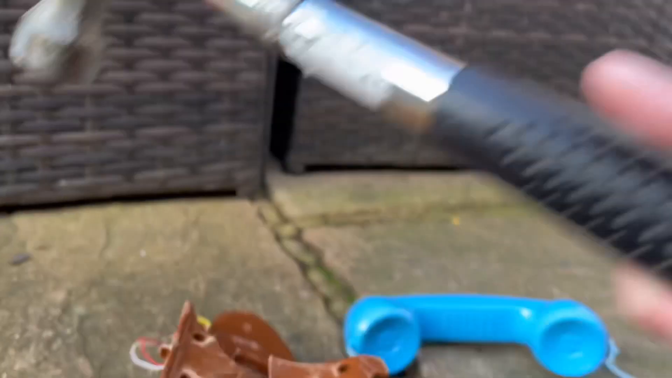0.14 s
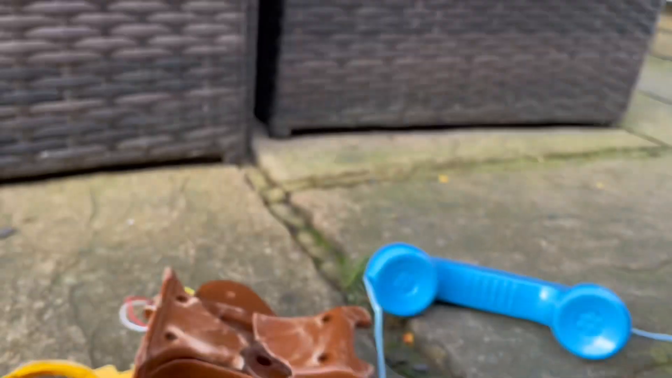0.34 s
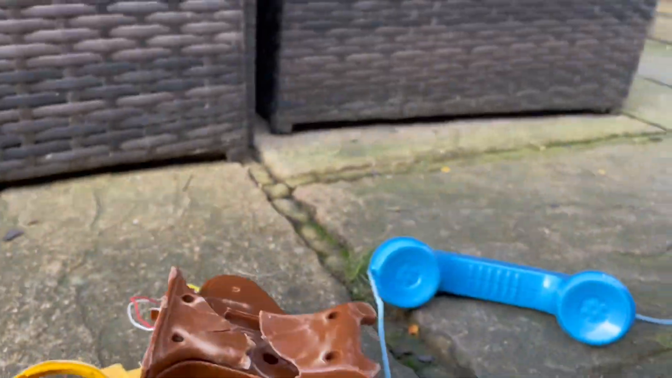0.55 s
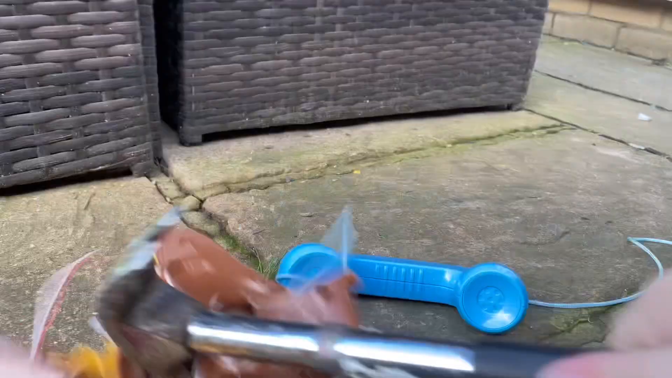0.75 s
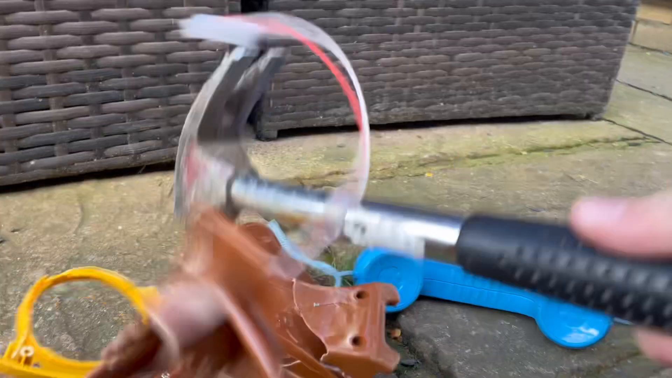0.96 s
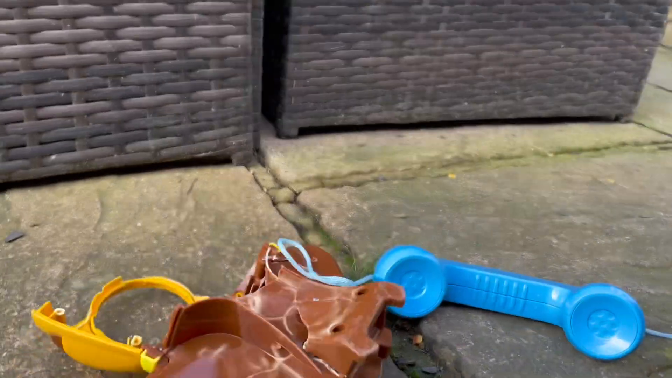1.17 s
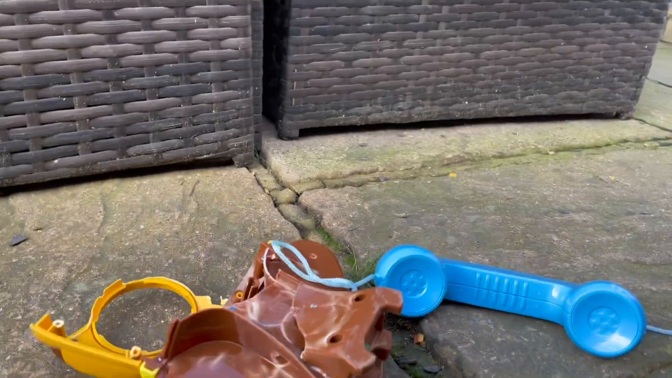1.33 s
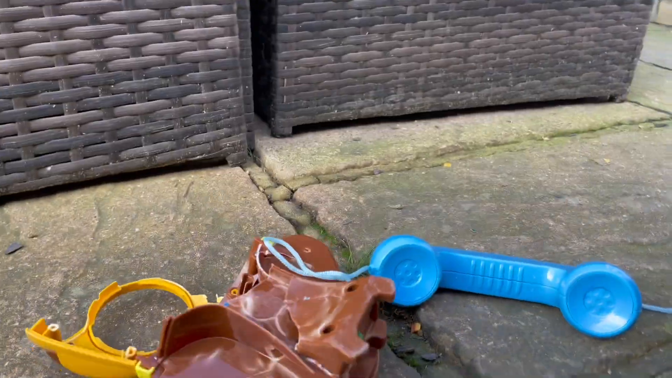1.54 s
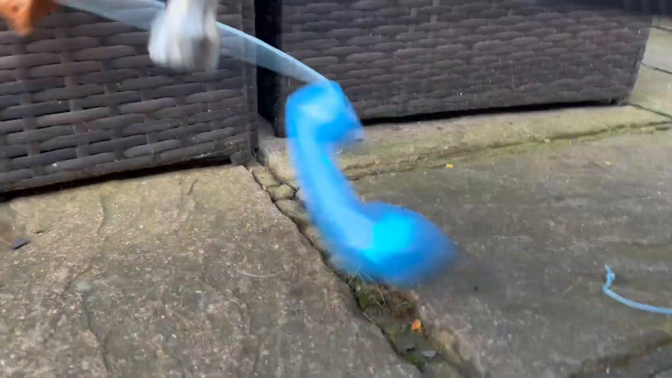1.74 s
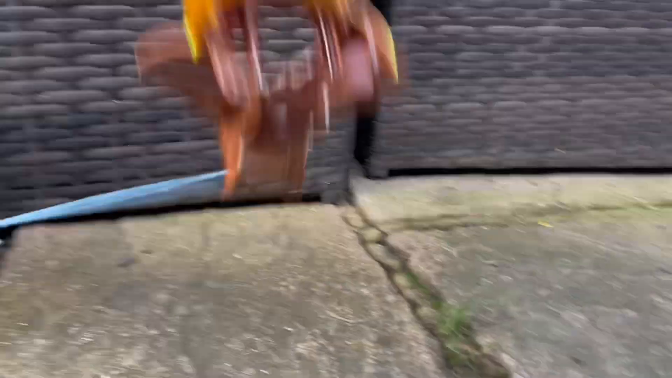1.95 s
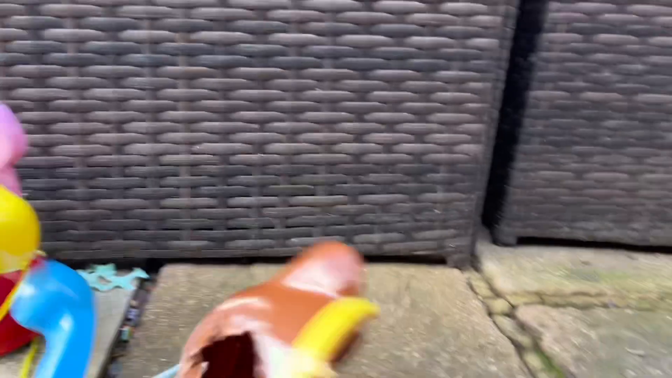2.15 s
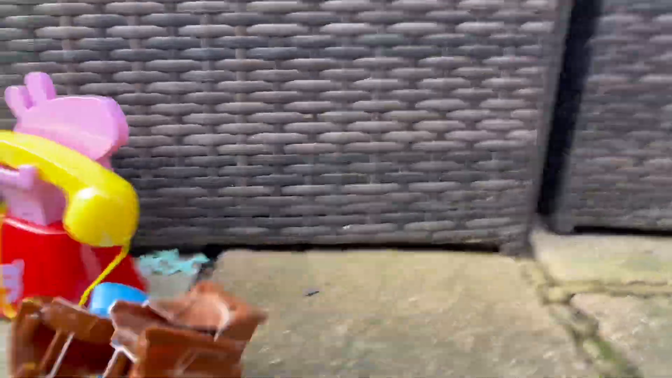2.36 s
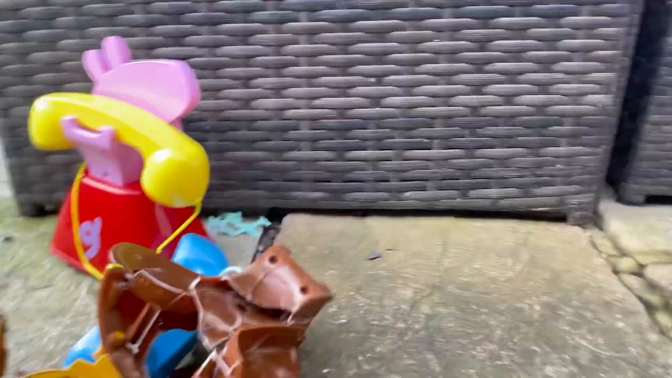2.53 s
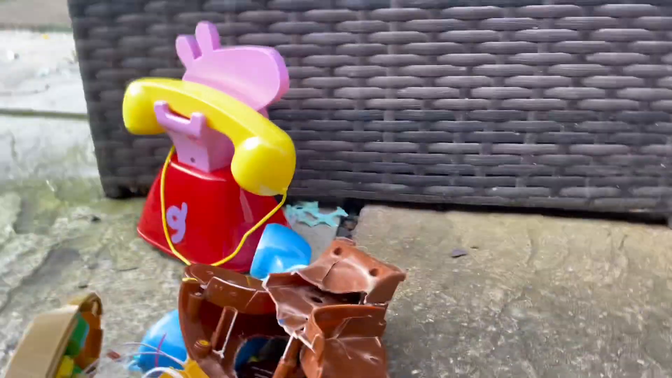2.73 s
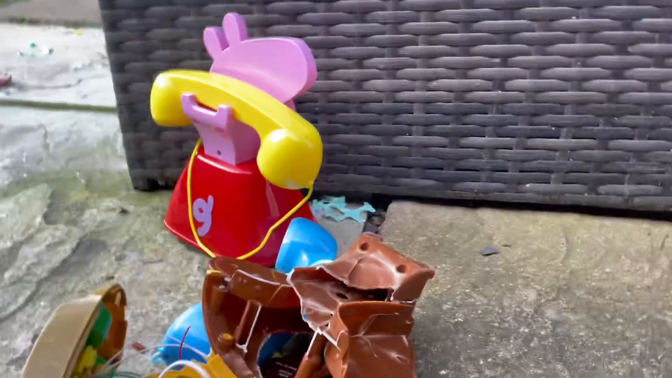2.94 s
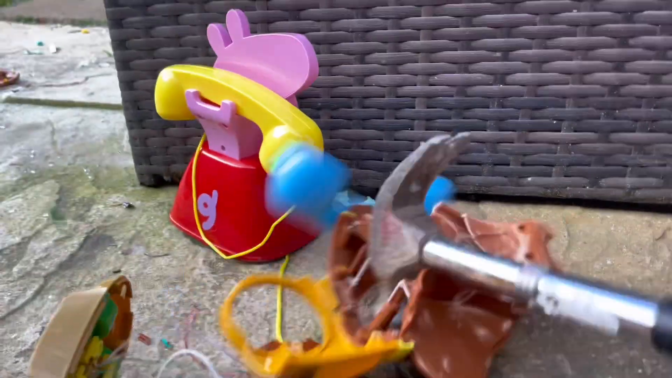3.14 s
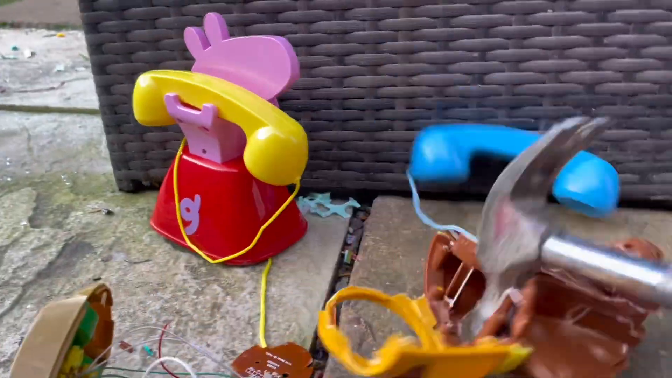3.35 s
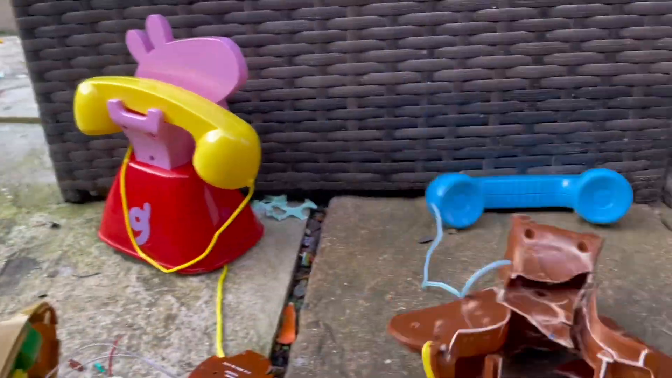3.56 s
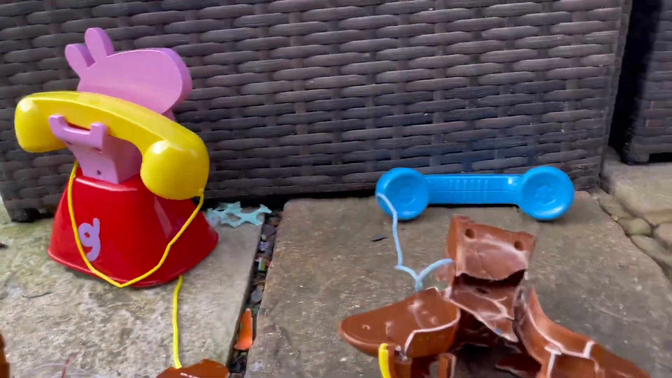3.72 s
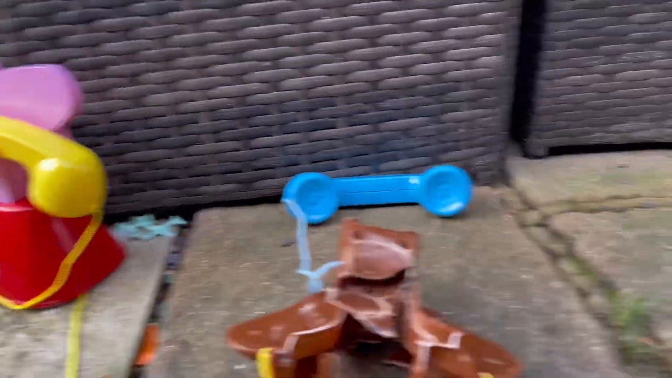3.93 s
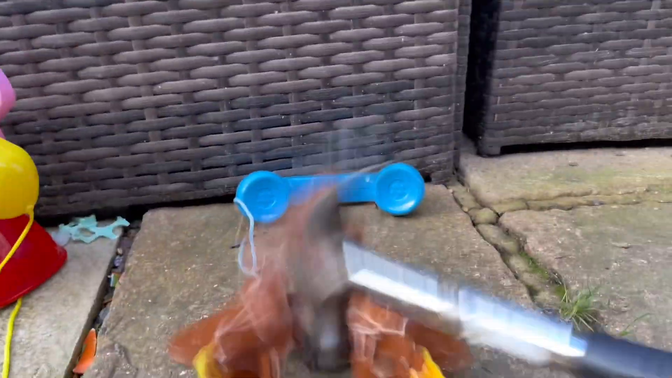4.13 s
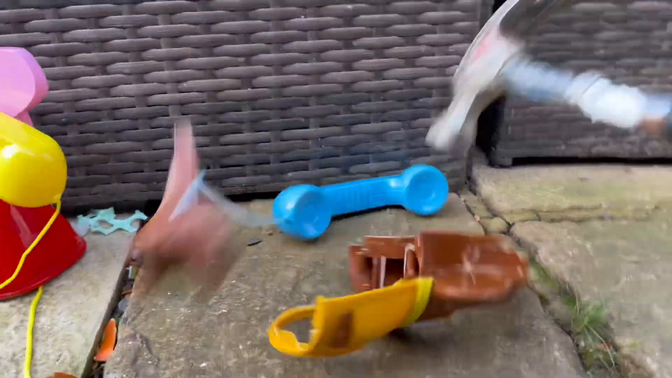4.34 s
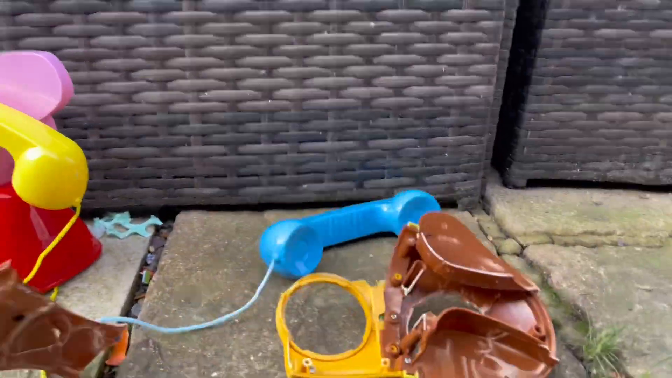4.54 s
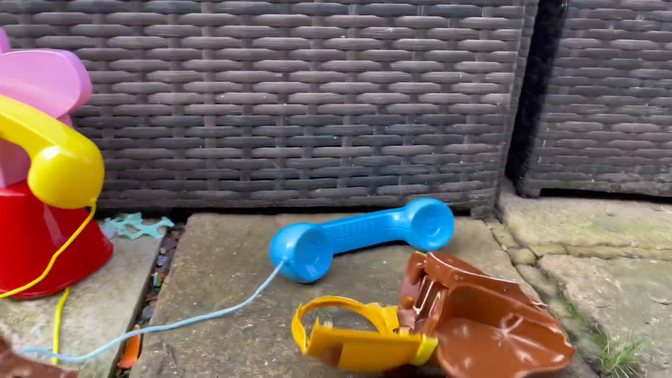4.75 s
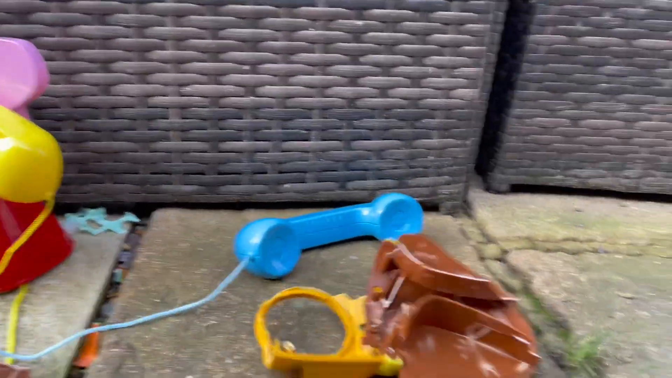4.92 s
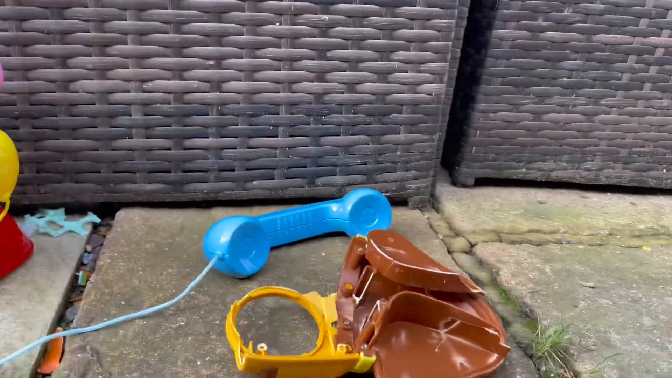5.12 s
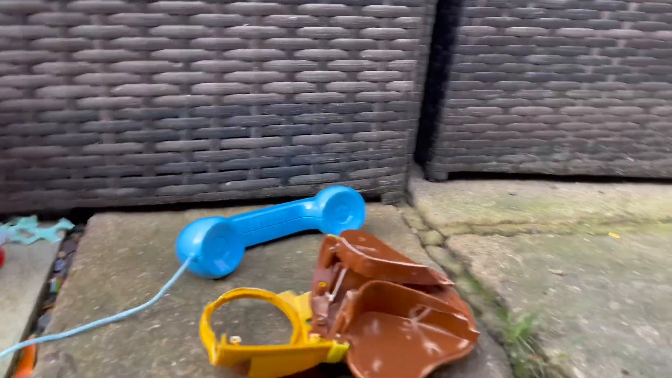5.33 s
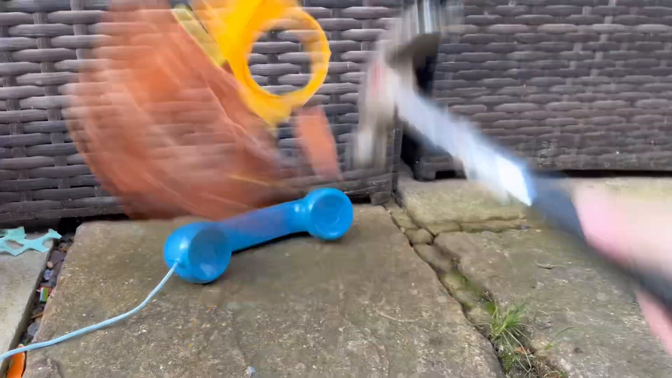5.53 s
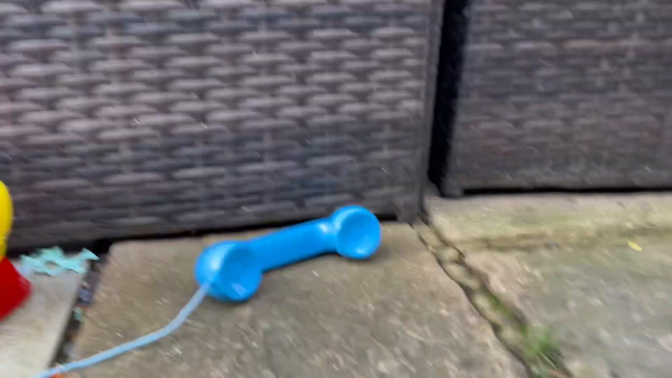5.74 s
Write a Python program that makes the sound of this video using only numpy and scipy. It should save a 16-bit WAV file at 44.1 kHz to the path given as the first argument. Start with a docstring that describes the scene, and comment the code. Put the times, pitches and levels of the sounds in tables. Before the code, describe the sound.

On a quiet outdoor patio, a brief rattle of plastic on stone leads into five hammer blows on a hollow toy telephone. Each hit crunches the shell with a dull thump, and broken pieces tumble, slide and scuff across the paving, loudest after the second blow. One little shard pings twice after the fourth. Everything is close, with a slight echo and soft, low gusts on the moving microphone.

```python
"""Bits of plastic clatter and skid over paving stones, close by, as air rumbles on a moving microphone.
Then a hammer smashes a hollow plastic toy telephone with five blows. Each blow crushes the shell in a
burst of cracks and a low thud. The pieces bounce, slide, rock and scuff on the stone, and one small
shard pings twice. The patio answers with a short, faint echo."""
import sys
import numpy as np
from scipy import signal
from scipy.fft import rfft, irfft, next_fast_len
from scipy.io import wavfile
from scipy.ndimage import uniform_filter1d, map_coordinates

SR = 44100
rng = np.random.default_rng(int(sys.argv[2]) if len(sys.argv) > 2 else 0)


def to_wav(sig):
    """Store sig (one row per channel, or 1-D mono) as 16-bit WAV at the path in sys.argv[1].

    Samples outside -1..1 are clipped; the rate is SR.
    """
    pcm = np.clip(np.atleast_2d(sig), -1, 1) * 32767
    pcm = np.round(pcm).astype(np.int16)
    wavfile.write(sys.argv[1], SR, pcm.T)  # frames by channels


N = 259308
T = np.arange(SR // 4) / SR  # seconds since the start of one hit

# Levels are relative; the functions add their own gains. t60_s is the time to fade by 60 dB.
# A positive pan_db leans left.
# gusts as the microphone swings: peak_s, rumble_db, flutter_vs_rumble_db, swell_s
GUSTS = [(0, -45.5, -2.5, 0.07), (.88, -35, -25.5, .04), (.98, -40.5, -20, 0.045), (1.27, -54, -21, .025),
         (1.66, -55.5, -12, 0.056), (1.92, -47.5, -6.5, .1), (3.27, -46.5, -16.5, 0.088),
         (3.48, -48, -20.5, 0.055), (3.98, -45.5, -4, .12), (4.36, -32.5, -25.5, .06),
         (4.52, -42.5, -8, 0.05), (4.81, -48.5, -10, 0.051), (5.01, -42.5, -20.5, .02),
         (5.11, -45.5, -13.5, 0.032), (5.28, -44.5, -14.5, .035), (5.6, -48, -7.5, .06),
         (5.78, -42.5, -15.5, .1)]
# quick puffs of air: peak_s, level_db, half_length_s
PUFFS = [(1.825, -51, 0.014), (1.875, -39, 0.0099), (1.903, -39, 0.0071), (2.892, -66, 0.0129),
         (3.727, -48.5, 0.0067), (3.854, -55.5, 0.012), (4.077, -46.5, 0.015), (4.982, -41.5, .014),
         (5.012, -45.5, 0.0049), (5.275, -52.5, 0.015), (5.422, -51.5, 0.0081)]
# faint air between gusts: rumble_db, flutter_db
CALM = (-66.5, -81.5)
# tone of deep wind, fluttering wind and the quiet garden: pitch_hz, level_db
RUMBLE_TONE = [(20, -10.5), (45, 3.5), (80, 8.5), (120, 4), (200, -12.5), (500, -69)]
FLUTTER_TONE = [(70, -19.5), (160, 5), (300, -3), (500, -22), (1000, -45), (3000, -56)]
GARDEN_TONE = [(59, -26.5), (100, 0.5), (244, -34), (1450, -35.5), (2470, -25), (7770, -52.5),
               (11600, -44.5), (16000, -55.5)]
# sliding pieces: start_s, length_s, rub_db, scratch_vs_rub_db
SLIDES = [(0, .35, -52.5, 7.5), (.77, .05, -49, 9), (0.912, 0.1, -49, 2.5), (1.069, 0.068, -58.5, 6),
          (1.259, 0.085, -69, 1), (1.68, .21, -61, 5.5), (1.955, 0.052, -48, 1.5), (2.07, .12, -45, 2.5),
          (2.26, 0.2, -58.5, 7), (2.451, .21, -55.5, 8.5), (3.155, .04, -40.5, 3.5), (3.243, .21, -50, -1),
          (3.614, 0.033, -45.5, 3.5), (3.696, 0.081, -74, 8), (4.176, 0.17, -56, -3.5),
          (4.417, 0.29, -52.5, -0.5), (4.791, .08, -63, -1), (5.56, .14, -65.5, -1)]
# tone of rubbing, scratching and scuffing on stone: pitch_hz, level_db
RUB_TONE = [(150, -22.5), (400, -4.5), (900, 0), (1600, 1.5), (2400, -11.5), (4000, -24.5), (9000, -53.5)]
SCRATCH_TONE = [(800, -34), (2000, -4.5), (3200, 1), (6000, 1), (9000, -6.5), (13000, -18), (16000, -22.5)]
SCUFF_TONE = [(250, -23), (700, -1), (1100, 0), (1450, 3), (1900, -6.5), (2500, -0.5), (3200, -9),
              (5000, -10.5), (7500, -18.5), (14000, -28)]
# pieces hitting stone: start_s, click_db, body_vs_click_db, fizz_vs_click_db, pan_db, t60_s
CLACKS = [(0.002, -23, -5, -7, 9, 0.063), (0.035, -13.5, -15, -12.5, 7, 0.019),
          (0.071, -35, -6.5, -10, 11, 0.1), (0.104, -26.5, -17, -18, 3, .02),
          (0.12, -30.5, -6, -13, 3, 0.037), (0.185, -27, -6.5, -14, 3, .076),
          (0.269, -38, 1.5, -9.5, -1, 0.091), (0.325, -41.5, 2, -24, -2, 0.18),
          (0.824, -34, -1.5, -18, 10, 0.13), (0.943, -29, -10.5, -9, 6, 0.03),
          (1.054, -24, -8, -16, 9, 0.075), (1.08, -23, -16, -14.5, 0.5, 0.035),
          (1.183, -32.5, -33, -33, 2, .025), (1.232, -33, -28, -10.5, 6, 0.043),
          (1.291, -36.5, -33, -10, 5, 0.026), (1.806, -34, -21.5, -9, 3, 0.05),
          (1.866, -27, -17.5, -10, 3.5, 0.072), (1.956, -17, -7.5, -12, 6, 0.07),
          (2.002, -36.5, -8, -30, 8.5, 0.067), (2.048, -11, -20, -19.5, 3.5, 0.083),
          (2.062, -9, -14.5, -18, 2, 0.036), (2.1, -18, -24, -13.5, 0, .17),
          (2.122, -16.5, -11.5, -10, 8, 0.068), (2.171, -24, -16, -19, 10, 0.061),
          (2.241, -20, -14.5, -10.5, 6.5, .047), (2.155, -39, 5, -6, 9, 0.023),
          (2.301, -34.5, -6.5, -20, 6, 0.21), (2.362, -28, -16.5, -21, 3.5, 0.16),
          (2.404, -32.5, -15, -15, 6, 0.2), (2.506, -30, -18, -12.5, 7, 0.14),
          (2.556, -31, -44, -13, 5, 0.14), (3.248, -25, -26, -12, 0, 0.09),
          (3.332, -39, -7.5, -18, 7.5, 0.13), (3.425, -21.5, -9.5, -14, 4.5, 0.095),
          (3.438, -19, -14.5, -15.5, 0, 0.068), (3.52, -27, -4, -16, 3, 0.051),
          (3.586, -35.5, -10, -6, 0, 0.094), (3.603, -16.5, -16, -17, 2, 0.05),
          (3.694, -51.5, -16, 4, -4, .06), (4.204, -28.5, -6, -17, 2, 0.029),
          (4.285, -31.5, -9.5, -23, 1.5, 0.14), (4.361, -34.5, -8, -13.5, 4.5, 0.12),
          (4.401, -22.5, -37, -9, 6, 0.045), (4.435, -29.5, -13, -18, 3, 0.24),
          (4.536, -49, 4, -16, 6, .05), (4.566, -44.5, 2, 0.5, 0.5, 0.02),
          (4.624, -31, -24, -21, 4.5, 0.044), (4.828, -35.5, -12, -31, 2, 0.13),
          (5.09, -37, -20.5, -14.5, 7, 0.055), (5.606, -44, -9, -17, -3, 0.035)]
# a clack's body, click and fizz: low_hz, high_hz
CLACK_BANDS = [(260, 1500), (1500, 7000), (7000, 14500)]
# hollow pieces rocking: start_s, length_s, high_ring_db, deep_ring_db
ROCKS = [(.08, 0.33, -46, -59.5), (1.959, .2, -66, -40.5), (2.236, 0.49, -54.5, -57),
         (3.17, 0.153, -69, -47), (3.503, 0.2, -54.5, -64.5), (4.407, 0.29, -52, -59)]
# ringing notes of hollow pieces (high, deep), the toy's shell and a shard: pitch_hz, level_db, t60_s
HIGH_NOTES = [(1030, -11, .08), (1105, 0, .22), (1440, -10, .1)]
DEEP_NOTES = [(575, -6, .05), (648, 0, .12), (760, -6, .05), (900, -7, .05)]
SHELL_NOTES = [(860, -8, .02), (969, 0, .033), (1130, -6, .025), (1300, -3, .025), (1708, 0, .045),
               (2020, -3, .035), (2460, -9, .03), (2863, -9, .03), (3631, -7, .04), (4021, -8, .04),
               (4600, -10, .03), (5442, -8, .04)]
SHARD_NOTES = [(2720, -9, .018), (2900, -1, .03), (3079, 0, .035), (4619, -8, .025), (5400, -11, .015),
               (6277, -12, .02), (6934, -12, .02), (11500, -16, .015)]
# soft scuffs: start_s, level_db, rise_s
SCUFFS = [(0.443, -67, 0.0058), (.505, -67.5, 0.0032), (.553, -62, .003), (0.607, -66, 0.0032),
          (1.249, -50.5, .008), (1.463, -57, .0067), (1.545, -66, .0076), (2.618, -51.5, 0.024),
          (3.196, -41, .008), (4.828, -46, .011), (4.954, -55.5, 0.015), (5.085, -47.5, 0.0118),
          (5.173, -62, .012), (5.279, -57.5, 0.0097), (5.335, -68, 0.0092), (5.417, -66, 0.01)]
# hammer blows: start_s, crack_db, body_vs_crack_db, fizz_vs_crack_db, pan_db, crush_s,
# ring_db, pitch_ratio, lowest_note_extra_db, boom_db, knock_vs_boom_db
BLOWS = [(0.742, -13.5, -5, -7.5, 7, 0.021, -9.5, 0.872, -3.5, -12.5, -3.5),
         (1.655, -14, -5.5, -7.5, 4, 0.021, -17.5, 1.42, 4.5, -12, 0.5),
         (3.132, -16.5, 3.5, -0.5, 2, 0.022, -11, 1.002, -2, -16, 5),
         (4.151, -11.5, 1.5, -5, 2, 0.0092, -10.5, 1, 3, -15, -2.5),
         (5.52, -13, 0.5, -7, 1, 0.0041, -12.5, 0.995, 20, -13.5, 5.5)]
# a blow's hollow depth, body, crack and fizz: low_hz, high_hz
BLOW_BANDS = [(220, 700), (700, 2100), (2100, 7000), (7000, 15800)]
# thuds of bouncing pieces: start_s, boom_db, knock_vs_boom_db
THUDS = [(0.857, -34.5, -27), (0.902, -29, -15.5), (0.941, -30, -6), (0.991, -25, -19), (1.052, -28.5, -9),
         (1.098, -36, -17), (1.23, -48, -6), (3.303, -35, -15), (3.422, -28.5, -3), (3.466, -34.5, -14),
         (4.332, -29, -13.5), (4.36, -26, -11), (4.377, -22.5, -14), (4.399, -22.5, -10.5),
         (4.426, -20, -5.5), (4.467, -34, -10.5), (4.477, -25.5, -5.5), (4.505, -35, -12),
         (5.704, -34.5, -11), (5.757, -20, -4), (5.798, -29, -9)]
# the shard's landings: start_s, level_db, overtones_db
PINGS = [(4.7114, -29, -4), (4.786, -28.5, 1.5)]
# how long the patio echoes: pitch_hz, t60_s
ECHO_TIMES = [(150, 0.3), (1000, 0.19), (4000, 0.45), (12000, 0.066)]
# how much the microphone's body shades its far side: pitch_hz, share_of_pan
SHADOW = [(200, .1), (700, .65), (1400, .9), (2500, 1), (5000, .85), (9000, .35), (15000, .25)]
# how far the left side's wave runs ahead of the right: pitch_hz, lead_radians
LEFT_LEAD = [(60, .66), (500, .7), (1100, .55), (2100, .7), (2700, 1.4), (3400, .6), (4700, .8), (5500, .3),
             (6700, -1), (7850, -2.9), (9400, -3.9), (10300, -6), (12800, -6.6), (14000, -9.3),
             (16000, -9.5)]


def amp(db):
    """Turn decibels into a gain."""
    return 10 ** (np.asarray(db) / 20)


def unit(x):
    """Scale to an average (rms) level of 1."""
    return x / np.sqrt(np.mean(x ** 2) + 1e-20)


def crest(x):
    """The level of the loudest 4 ms."""
    return np.sqrt(uniform_filter1d(x ** 2, SR // 250).max() + 1e-20)


def along(points, hz):
    """Read between a table's rows on a log pitch scale."""
    pitches, values = np.transpose(points)
    return np.interp(np.log(hz + 1), np.log(pitches + 1), values)


def wobble(rate):
    """A smooth curve through `rate` random points a second."""
    points = rng.standard_normal(int(N * rate / SR) + 4)
    return map_coordinates(points, [np.arange(N) * rate / SR])


def flicker(depth, samples):
    """A jittery gain for one hit."""
    return np.exp(depth * unit(uniform_filter1d(rng.standard_normal(len(T)), size=samples)))


def filtered(x, response):
    """Scale and delay each frequency by response(hz)."""
    n = x.shape[-1]
    padded = 2 * next_fast_len((n + SR // 8) // 2)
    return irfft(rfft(x, padded) * response(np.fft.rfftfreq(padded, 1 / SR)), padded)[..., :n]


def coloured(x, tone):
    """Shape a sound with a tone table, at level 1."""
    return unit(filtered(x, lambda hz: amp(along(tone, hz))))


def noise(width):
    """Stereo noise: a shared part plus each side's own."""
    return rng.standard_normal(N) + width * rng.standard_normal((2, N))


def fade(t60):
    """Die away by 60 dB in t60 seconds."""
    return np.exp(-np.log(1000) * T / np.maximum(t60, .001))


def movement(start, length, attack_s, sag_db_per_s, stop_db_per_s):
    """The gain of a movement that starts, slowly weakens and stops."""
    t = np.maximum(np.arange(N) / SR - start, 0)
    drop_db = sag_db_per_s * t + stop_db_per_s * np.maximum(t - length, 0)
    return np.minimum(t / attack_s, 1) * amp(-drop_db)


def add(track, start, sound):
    """Mix a hit in at `start` seconds."""
    i = max(round(start * SR), 0)
    track[:, i:i + len(T)] += sound[..., :N - i]


def ring(notes, scatter_db):
    """A struck object's fading notes, each with a random strength and sign."""
    hz, db, t60 = np.transpose(notes)[:, :, None]
    gain = amp(db + scatter_db * rng.standard_normal(hz.shape)) * rng.choice([-1, 1], hz.shape)
    return np.sum(gain * np.sin(2 * np.pi * hz * T) * fade(t60), axis=0)


def rung_by(notes, knocks):
    """Ring the notes at every knock."""
    tone = ring(notes, scatter_db=-0.5)
    return signal.fftconvolve(knocks, tone / crest(tone))[:N]


def balanced(x, levels_db, bands):
    """Give each pitch band of a hit its own level."""
    parts = [signal.sosfilt(signal.butter(3, band, "band", fs=SR, output="sos"), x) for band in bands]
    return sum((-1) ** k * amp(levels_db[k]) * part / crest(part) for k, part in enumerate(parts))


def placed(x, pan_db, bounce=.6):
    """Shade the far side and give each side its own reflections off the ground."""
    ground = rng.standard_normal((2, SR // 300))
    ground = bounce * ground / np.linalg.norm(ground, axis=1, keepdims=True)

    def response(hz):
        shade = along(SHADOW, hz)
        return amp(np.outer([.5, -.5], pan_db * shade)) * (1 + shade * rfft(ground, 2 * len(hz) - 2))
    return filtered(x, response)


def clatter(click_db=-9, body_db=-4, fizz_db=-2, note_count=18, attack_s=0.00024):
    """Each piece snaps on the stone, chatters and rings briefly with notes of its own."""
    out = np.zeros((2, N))
    for start, db, body, fizz, pan, t60 in CLACKS:
        hz = rng.uniform(np.sqrt(500), np.sqrt(15000), note_count) ** 2
        piece = ring(np.c_[hz, np.zeros(note_count), np.full(note_count, min(t60, .04))], scatter_db=3)
        snap = 0.42 * fade(t60=0.024)
        chatter = flicker(.45, samples=60) * fade(t60)
        contact = (snap + chatter) * rng.standard_normal(len(T))
        hit = (0.41 * piece / crest(piece) + contact / crest(contact)) * (1 - np.exp(-T / attack_s))
        levels_db = [db + body + body_db, db + click_db, db + fizz + fizz_db]
        add(out, start, placed(balanced(hit, levels_db, CLACK_BANDS), pan))
    return out


def skids(scratch_db=-2, grit=.55, ticks_per_s=24):
    """Pieces rub and scratch over grit as friction slows them; an edge ticks when it catches."""
    rub, scratch, ticks = np.zeros(N), np.zeros(N), np.zeros((2, N))
    for start, length, db, bright_db in SLIDES:
        speed = movement(start, length, attack_s=0.0061, sag_db_per_s=36, stop_db_per_s=286.5)
        rub += amp(db) * speed
        scratch += amp(db + bright_db) * speed
    grains = np.exp(grit * wobble(350) + 0.23 * wobble(45))
    body = rub * coloured(grains * noise(1.0), RUB_TONE)
    hiss = amp(scratch_db) * scratch * coloured(grains * noise(.4), SCRATCH_TONE)
    for k, (late, size, pitch) in enumerate(rng.random((160, 3))):
        start = (k + late) / ticks_per_s
        i = int(start * SR)
        if i < N and scratch[i] > 1e-4:  # only while a piece slides
            tone = ring(np.array(SHELL_NOTES) * [1 + 1.5 * pitch, 1, 1], scatter_db=5)
            tick = tone / crest(tone) + fade(t60=.03) * rng.standard_normal(len(T))
            add(ticks, start, scratch[i] * amp(3.5 + 6 * size) * tick / crest(tick))
    return placed(body + hiss, pan_db=3) + placed(ticks, pan_db=7)


def air(garden_db=-79):
    """Gusts and puffs brush the moving microphone over a quiet garden."""
    t = np.arange(N) / SR
    rumble, flutter = amp(CALM)
    for peak, db, flutter_db, swell in GUSTS:
        gust = amp(db) / np.cosh((t - peak) / swell)
        rumble = np.hypot(rumble, gust)
        flutter = np.hypot(flutter, amp(flutter_db) * gust)
    puffs = sum(amp(db) * np.exp(-((t - peak) / half) ** 2) for peak, db, half in PUFFS)
    low = rumble * amp(0.89 * wobble(8.9)) * coloured(noise(0.33), RUMBLE_TONE)
    high = (flutter * amp(3 * wobble(25)) + puffs) * coloured(noise(.3), FLUTTER_TONE)
    return low + high + amp(garden_db) * coloured(noise(0.8), GARDEN_TONE)


def rocking(ring_db=4, rubbing=.005):
    """Each clack rings the rocking hollow pieces; rough stone keeps them faintly sounding in between."""
    high, deep = np.zeros(N), np.zeros(N)
    for start, length, high_db, deep_db in ROCKS:
        sway = movement(start, length, attack_s=.02, sag_db_per_s=10.5, stop_db_per_s=329.5)
        high += amp(high_db) * sway
        deep += amp(deep_db) * sway
    knocks = rubbing * rng.standard_normal(N)
    for start, *_ in CLACKS:
        knocks[round(start * SR)] += rng.uniform(.5, 1.5)
    ringing = high * rung_by(HIGH_NOTES, knocks) + deep * rung_by(DEEP_NOTES, knocks)
    return placed(amp(ring_db) * ringing, pan_db=1)


def scuffs(grit=0.38):
    """Short, dull rubs over grit swell and die."""
    push = np.zeros((1, N))
    for start, db, rise in SCUFFS:
        add(push, start, amp(db) * T / rise * np.exp(1 - T / rise))
    grains = np.exp(grit * wobble(340))
    return placed(push * coloured(grains * noise(1.0), SCUFF_TONE), pan_db=2)


def hammer_blows(lead_s=.02, give_s=0.0038, give_db=-11, release_s=0.048, spray_db=-24, spray_s=0.19):
    """The shell gives, cracks over and over as the head sinks in, and sprays splinters."""
    out, t = np.zeros((2, N)), T - lead_s
    for start, db, body, fizz, pan, crush_s, ring_db, pitch, lowest_db, _, _ in BLOWS:
        giving = amp(give_db) * np.exp(np.minimum(t, 0) / give_s)
        crushing = amp(-4 * np.clip(t / crush_s, 0, 1))
        after = np.maximum(t - crush_s, 0)
        dying_away = amp(-60 * after / release_s) + amp(spray_db - 60 * after / spray_s)
        force = np.where(t < 0, giving, crushing) * dying_away
        cracks = force * flicker(.3, samples=40) * rng.standard_normal(len(T))
        notes = np.array(SHELL_NOTES) * [pitch, 1, 1]  # each break retunes the shell
        notes[0, 1] += lowest_db
        shell = ring(notes, scatter_db=2)
        ringing = signal.fftconvolve(cracks, shell / np.linalg.norm(shell))[:len(T)]
        levels_db = [db - 9, db + body - 2, db - 2, db + fizz + 1]
        burst = balanced(cracks + amp(ring_db) * ringing, levels_db, BLOW_BANDS)
        add(out, start - lead_s, placed(burst, pan))
    return out


def thuds(lag_cycles=1.3, knock_db=4, landing_s=.003, gain_per_crush_s=18):
    """The hammer and bouncing pieces give dull pushes; the lows arrive last, so each falls in pitch."""
    out, hz = np.zeros((2, N)), np.fft.rfftfreq(len(T), 1 / SR)
    tone_db = along([(15, -26), (40, -5.5), (65, 3.5), (115, 0.0), (160, 1.0), (250, -1.5), (500, -8.5),
                     (1000, -25), (2200, -40.5), (4000, -70.5), (9000, -115)], hz)
    glide = np.exp(-2j * np.pi * lag_cycles * np.log(hz + 1))
    pushes = [(start, amp(db), knock) for start, db, knock in THUDS]
    # The head thuds as it lands and again as it bottoms out, harder the deeper it sank.
    for start, _, _, _, _, crush_s, _, _, _, boom, knock in BLOWS:
        pushes += [(start + landing_s, amp(boom), knock),
                   (start + landing_s + .8 * crush_s, amp(boom) * gain_per_crush_s * crush_s, knock)]
    for start, gain, knock in pushes:
        hardness_db = (knock + knock_db) * along([(120, 0.069), (450, 0.82)], hz)
        push = irfft(amp(tone_db + hardness_db) * glide, len(T))
        add(out, start, gain * push / crest(push))
    return out


def shard_pings(ping_db=-3):
    """One small stiff shard lands twice; a harder landing brings out its high notes."""
    out = np.zeros((2, N))
    hz, note_db, t60 = np.transpose(SHARD_NOTES)
    for start, db, overtones_db in PINGS:
        notes = np.c_[hz, note_db + overtones_db * (hz > 4000), t60]
        hit = ring(notes, scatter_db=0.5) + 0.2 * fade(t60=0.034) * rng.standard_normal(len(T))
        add(out, start, placed(amp(db + ping_db) * hit / crest(hit), pan_db=2))
    return out


def patio_echo(x, build_s=0.026):
    """Furniture and walls scatter a short echo, different on each side."""
    hz, t, spectrum = signal.stft(rng.standard_normal((2, SR // 2)), SR, nperseg=256)
    decay = amp(-60 * t / along(ECHO_TIMES, hz)[:, None])
    _, tail = signal.istft(spectrum * decay, SR, nperseg=256)
    tail *= 1 - np.exp(-np.arange(tail.shape[1]) / SR / build_s)
    return signal.fftconvolve(x, tail / np.linalg.norm(tail[0]), axes=1)[:, :N]


def scene():
    """Mix all the sounds on the patio."""
    smash, bits, low = hammer_blows(), clatter() + shard_pings(), thuds()
    echo = patio_echo(amp(-31.5) * smash + amp(-21.5) * bits + amp(-28.0) * low)
    return smash + bits + low + skids() + rocking() + scuffs() + echo + air()


def record(dry):
    """A microphone with two spaced openings softly squashes loud peaks and cuts the highest treble."""
    ceiling, top_hz = .9, 16050
    pair = filtered(dry, lambda hz: np.exp(1j * np.outer([.5, -.5], along(LEFT_LEAD, hz))))
    squashed = pair / (1 + np.abs(pair / ceiling) ** 4) ** (1 / 4)
    return filtered(squashed, lambda hz: 1 / (1 + (hz / top_hz) ** 120))


dry = scene()
out = record(dry)
to_wav(out)
```